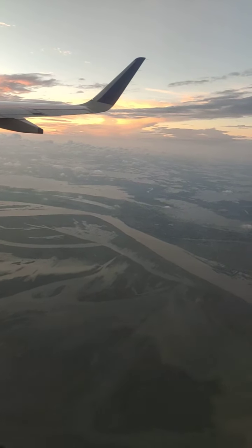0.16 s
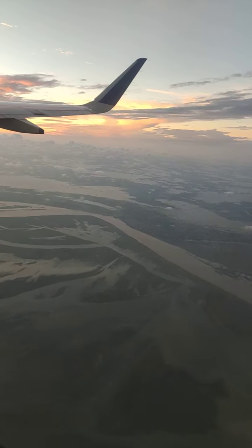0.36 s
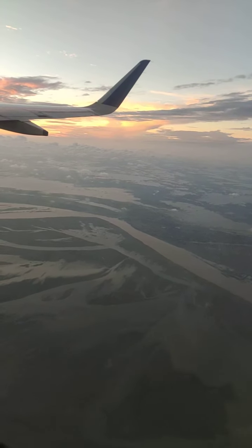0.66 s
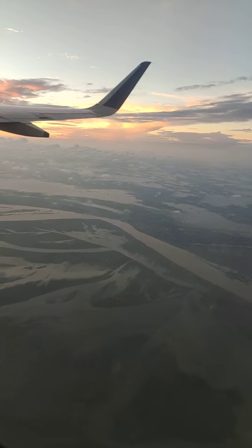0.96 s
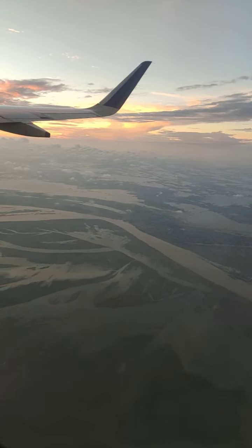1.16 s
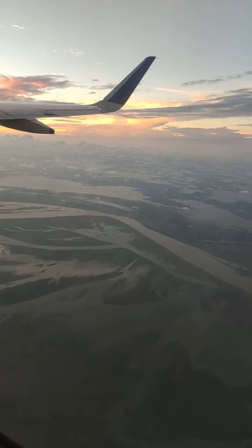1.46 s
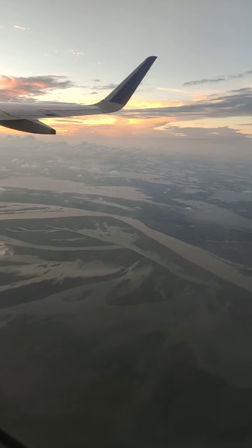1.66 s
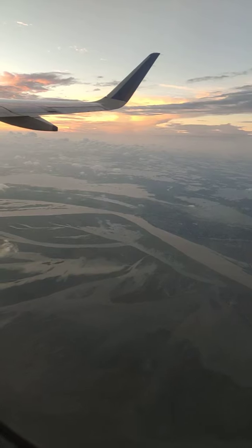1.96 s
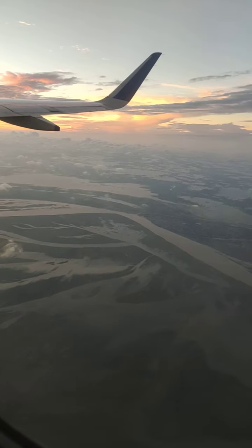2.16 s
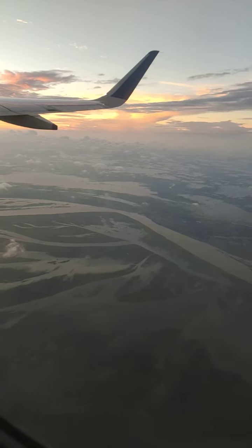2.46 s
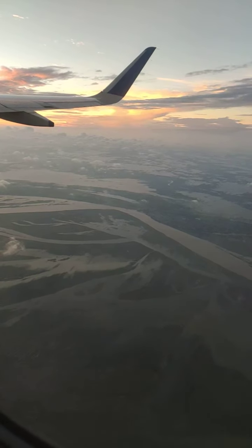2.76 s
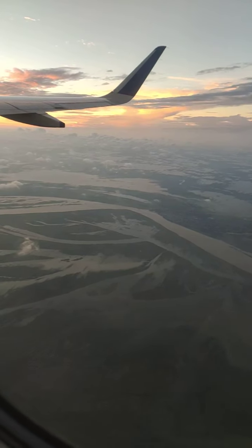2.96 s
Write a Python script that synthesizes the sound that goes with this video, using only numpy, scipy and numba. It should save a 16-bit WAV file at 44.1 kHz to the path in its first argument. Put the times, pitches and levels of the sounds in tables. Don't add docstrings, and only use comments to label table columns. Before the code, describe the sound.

Airliner cabin drone runs unbroken for about 3.1 seconds: a dense low rumble, strongest around 100 to 500 hertz, quivering in small irregular lumps without any trend. A faint, hollow, grainy air hiss differs left and right. A barely audible thin tick comes at 0.1; faint rising seal whistles at about 2.0 and 2.5 are nearly buried. Close phone at the window, no echo.

```python
import sys
import numpy as np
from scipy import signal
from scipy.fft import rfft, irfft
from scipy.io import wavfile
from scipy.ndimage import map_coordinates
from numba import njit

SR = 44100
rng = np.random.default_rng(int(sys.argv[2]) if len(sys.argv) > 2 else 0)


def wav_record(signal):
    frames = np.transpose(np.atleast_2d(signal))
    bounded = np.clip(frames, -1, 1)
    quanta = np.round(bounded * 32767).astype(np.int16)
    wavfile.write(sys.argv[1], SR, quanta)


def makeup_ratio(level_db):
    decades = np.asarray(level_db, float) / 20
    return 10 ** decades


N = 136710


def rumble():
    # f/Hz, density/dB per Hz
    slope = [(25, -73), (40, -82), (90, -52), (135, -46.5), (330, -45.5), (500, -55), (700, -73),
             (4000, -160)]
    # f/Hz, width/Hz, gain/dB
    panel_modes = [(42, 10, 9), (146.8, 30.5, 6.5), (276.4, 124, 4), (500, 50, 3), (549, 30, 3.5)]
    # t/s, level/dB
    buffet = [(0.0, -29), (0.08, -34), (0.14, -33), (0.33, -35.5), (0.34, -32.5), (0.66, -34.5),
              (0.69, -34.5), (0.98, -37), (1.04, -33.5), (1.22, -33), (1.64, -35), (1.67, -37.5),
              (1.77, -31), (1.91, -37), (1.98, -33), (2.12, -34), (2.23, -31.5), (3.08, -35.5)]
    # t/s, length/s, f/Hz, width/octaves, gain/dB
    booms = [(.05, 0.077, 139, 0.96, -9), (.16, 0.078, 150, 0.28, -1), (.2, .08, 78.2, 0.36, -3.5),
             (.25, .05, 407, 0.16, 6), (.37, .05, 150, 0.39, 5), (.47, 0.038, 208, 0.5, 5),
             (.52, .03, 120, 0.66, 7.5), (.61, 0.045, 164, 0.27, -8.5), (.65, 0.09, 418, .3, -3),
             (.71, .04, 162.3, .5, 14), (.85, 0.035, 90.8, 0.36, 9.5), (.94, .04, 136, .3, -7),
             (.96, .05, 308, .15, 7), (1.04, .04, 97.7, 0.36, 6), (1.08, 0.025, 500, 0.39, 9),
             (1.18, 0.059, 249, 0.16, 5), (1.25, .06, 150, 0.38, -7), (1.29, 0.11, 396, 0.17, -6),
             (1.37, .04, 220, 0.27, 8), (1.45, 0.074, 367, 0.13, 3), (1.5, 0.021, 263, 0.12, 5.5),
             (1.65, .06, 212, 0.22, 7), (1.76, 0.055, 248, 0.23, -4), (1.8, 0.069, 85, .4, -6.5),
             (1.93, .05, 406, 0.45, -3), (1.94, .03, 146, 0.35, 11), (1.99, 0.024, 211, 0.18, -6.5),
             (2.0, 0.05, 304, 0.19, 15.5), (2.06, .04, 381, 0.17, 6.5), (2.24, 0.044, 349, 0.29, -2.5),
             (2.28, 0.047, 145.4, .3, 2.5), (2.33, 0.021, 236, .15, -8), (2.42, 0.025, 292, .15, 6.5),
             (2.5, 0.071, 140, 0.24, -8), (2.43, 0.024, 436, 0.22, -7), (2.62, 0.032, 393, 0.26, -10.5),
             (2.65, .05, 90, 0.73, 10.5), (2.8, 0.053, 384, 0.32, 6.5), (2.85, 0.036, 230, 0.27, -1),
             (3.04, 0.063, 393, 0.18, 2)]
    level_db, buffet_ref_db, buffet_depth = -10, -30, 1.1
    right_db, left_lag_s = 0.74, 0.00019

    def lumps_db(hz, t):
        swell_db = buffet_depth * (np.interp(t, *np.array(buffet).T) - buffet_ref_db)
        swell_db = swell_db + spots_db(booms, hz, t)
        slow_db = 0.69 * field(hz, t, rate=2.7, per_octave=1.4)
        fast_db = 2.72 * field(hz, t, rate=17, per_octave=2.979)
        return level_db + swell_db + slow_db + fast_db

    low = patchy(coloured(slope, panel_modes), lumps_db, size=1024)
    late = map_coordinates(low, [np.arange(N) - left_lag_s * SR], mode="mirror")
    return np.array([late, low * makeup_ratio(right_db)])


def cabin_air():
    # f/Hz, density/dB per Hz
    air_left = [(40, -99), (150, -79), (350, -70), (1050, -89), (2350, -99), (3900, -105), (6200, -108),
                (15500, -124)]
    air_right = [(40, -95.5), (150, -89.5), (350, -74), (800, -78), (1250, -92.5), (3500, -92.5),
                 (5200, -103), (13000, -122.5)]
    # f/Hz, width/Hz, gain/dB
    cavity_left = [(150, 53, 15), (1647, 206, 18), (1482, 184, 10), (1864, 140, 9), (2330, 140, 1.5),
                   (2920, 560, 14.5), (3390, 180, 5), (4280, 440, 4.5), (5100, 400, -7), (6700, 220, 6),
                   (7350, 400, 12.5), (8960, 85, -10), (10100, 1600, 2)]
    cavity_right = [(138, 9.2, 18.5), (1578, 330, 11), (1640, 50, 3), (2330, 49, -3.5), (2360, 79, -6.5),
                    (2540, 190, 7), (3810, 200, -3.5), (4700, 270, 4), (5130, 300, -3.5),
                    (6514, 1020, 11.5), (6804, 130, 9), (7060, 530, 0.5), (9100, 140, -1.5),
                    (10200, 1400, 3), (14900, 1500, 7)]
    # t/s, level/dB
    flow = [(0.0, -45.5), (0.02, -46.5), (0.14, -52), (0.26, -54), (0.46, -58), (0.49, -58), (0.76, -49.5),
            (1.28, -53.5), (1.33, -49), (1.39, -59), (1.51, -50), (1.93, -46.5), (1.98, -55.5), (2.09, -48),
            (2.32, -58.5), (2.33, -46.5), (2.62, -55.5), (3.08, -49)]
    # t/s, length/s, f/Hz, width/octaves, gain/dB
    puffs = [(0.146, 0.074, 2400, 3.1, 2), (0.39, 0.14, 966, 0.69, 9), (0.792, 0.03, 680, 0.25, 13),
             (1.12, 0.11, 2880, .15, 5), (1.234, 0.017, 507, 0.6, 21.5), (1.329, 0.039, 3580, 0.29, 11),
             (1.58, 0.028, 1800, 0.92, 0), (1.864, 0.14, 2730, 0.071, 5), (2.202, 0.021, 1190, 0.41, 9),
             (2.373, .03, 700, .5, 10), (2.794, 0.046, 3020, .6, 6.5), (3.01, 0.0093, 3010, 2.1, 2.5),
             (.17, .06, 1055, .2, 7), (.22, .08, 3000, .15, -5), (.38, .05, 613, .3, -7),
             (.42, .06, 2300, .2, 4.5), (.62, .06, 3400, .1, -4), (.68, .08, 2810, .08, 2),
             (.92, .05, 896, .2, 5), (1.08, .03, 1935, .1, 8.5), (1.19, .04, 1900, .1, -8),
             (1.51, .05, 2310, .08, 7.5), (1.58, .05, 2950, .08, -5), (1.65, .07, 1915, .1, 4),
             (1.68, .07, 3800, .1, 2), (1.79, .04, 800, .2, -6.5), (1.9, .12, 3480, .08, -7.5),
             (1.98, .04, 1200, .15, 6), (2.05, .06, 2180, .1, 2.5), (2.17, .08, 1910, .07, -10),
             (2.43, .04, 2750, .07, -6.5), (2.64, .04, 740, .2, 8.5), (2.77, .04, 776, .2, 9),
             (2.68, .06, 3220, .07, 5.5), (2.96, .07, 2800, .3, -3.5), (3.07, .04, 1310, .4, 4),
             (2.29, .02, 5100, 1.2, 0.5)]
    # t/s, length/s, gain/dB
    cavity_swells = [(.18, 0.032, -2.5), (0.511, 0.049, -4), (0.679, .05, 2.5), (0.903, 0.036, -1),
                     (0.998, .04, 2), (1.326, 0.029, 5.5), (1.451, .04, -1), (1.849, .04, -3),
                     (2.08, .04, 3.5), (2.17, .04, 0.5), (2.362, 0.11, 3.5), (2.602, 0.037, -4),
                     (2.7, 0.029, 1), (3.007, 0.055, 1.5)]
    cavity_hz, cavity_octaves = 1570, 0.2
    level_db, flow_ref_db, flow_depth = 0.5, -51.5, 0.39
    flow_from_hz, steady_above_hz = 190, 6000
    crosstalk = 0.049

    def gusts_db(hz, t):
        square = hz[:, None] ** 2
        reach = square / (square + flow_from_hz ** 2)
        calm = steady_above_hz ** 2 / (square + steady_above_hz ** 2)
        stream_db = np.interp(t, *np.array(flow).T) - flow_ref_db
        db = level_db + flow_depth * calm * reach * stream_db
        singing = [(at, length, cavity_hz, cavity_octaves, gain_db) for at, length, gain_db in cavity_swells]
        db = db + spots_db(puffs + singing, hz, t)
        broad_db = 1.05 * np.sqrt(calm) * field(hz, t, rate=30, per_octave=0.44)
        fine_db = 0.61 * calm * field(hz, t, rate=12, per_octave=4.0)
        return db + broad_db + fine_db + 3.0 * streaks(hz, t, rate=15, width_hz=100)

    def port_streaks_db(hz, t):
        return 2.0 * streaks(hz, t, rate=14, width_hz=90)

    ports = np.array([coloured(air_left, cavity_left), coloured(air_right, cavity_right)])
    together = patchy(ports + crosstalk * ports[::-1], gusts_db, size=1024)[:, :N]
    return np.array([patchy(port, port_streaks_db, size=1024) for port in together])


def seal():
    # t/s, length/s, from f/Hz, to f/Hz, level/dB
    seal_whistles = [
        (2.03, 0.098, 297, 369, -51),
        (2.457, 0.13, 370, 521, -50.5),
    ]
    t, out = np.arange(N) / SR, 0
    for start, length, from_hz, to_hz, db in seal_whistles:
        part = np.clip((t - start) / length, 0, 1)
        phase = 2 * np.pi * np.cumsum(from_hz + (to_hz - from_hz) * part) / SR
        swell = np.sqrt(np.abs(np.sin(np.pi * part)))
        out = out + makeup_ratio(db) * swell * np.sin(phase)
    return out * np.array([[-.6], [1.1]])


def ticks():
    # t/s, level/dB
    case_ticks = [
        (.1, -56.5),
    ]
    decay_s = .002
    t, out = np.arange(N) / SR, 0
    for start, db in case_ticks:
        decay = (t > start) * np.exp(-np.clip(t - start, 0, 1) / decay_s)
        out = out + makeup_ratio(db) * decay * rng.standard_normal(N)
    thin = signal.butter(4, 12500, "high", fs=SR, output="sos")
    return signal.sosfilt(thin, out) * np.array([[.5], [1.1]])


def coloured(slope, resonances):
    hz = np.arange(N // 2 + 1) * SR / N + 1
    slope_hz, slope_db = np.array(slope).T
    db = np.interp(np.log(hz), np.log(slope_hz), slope_db)
    for centre, width, gain_db in resonances:
        db = db + gain_db / (1 + ((hz - centre) / (width / 2)) ** 2)
    return irfft(rfft(rng.standard_normal(N)) * makeup_ratio(db) * np.sqrt(SR / 2), N)


def patchy(x, gain_db, size):
    hz, t, cells = signal.stft(x, SR, nperseg=size, noverlap=size * 3 // 4, boundary="even")
    return signal.istft(cells * makeup_ratio(gain_db(hz, t)), SR, nperseg=size, noverlap=size * 3 // 4)[1][:N]


def field(hz, t, rate, per_octave):
    grid = rng.standard_normal((200, 200))
    place = np.broadcast_arrays(np.log2(1 + hz[:, None] / 40) * per_octave, t[None] * rate)
    return map_coordinates(grid, place, order=3, mode="mirror")


def streaks(hz, t, rate, width_hz):
    grid = rng.standard_normal((300, 100))
    place = np.broadcast_arrays(hz[:, None] / width_hz, t[None] * rate)
    return map_coordinates(grid, place, order=3, mode="mirror")


def spots_db(rows, hz, t):
    pitch, total = np.log2(hz[:, None] + 1), 0
    for at, length, centre_hz, octaves, gain_db in rows:
        time_off = (t - at) / length
        pitch_off = (pitch - np.log2(centre_hz)) / octaves
        total = total + gain_db * np.exp(-time_off ** 2 - pitch_off ** 2)
    return total


@njit
def follow(x, attack, release, start):
    y, e = np.empty(len(x)), start
    for i in range(len(x)):
        e += (abs(x[i]) - e) * (attack if abs(x[i]) > e else release)
        y[i] = e
    return y


def gain_control(x):
    ratio, attack_s, release_s = 1.15, .01, .04
    top = float(makeup_ratio(-36))
    env = follow(x.mean(0), 1 / (attack_s * SR), 1 / (release_s * SR), top)
    return x * (top / env) ** (1 - 1 / ratio)


def denoise(x):
    depth, floor_db, from_hz = 0.97, -28, 250
    hz, t, cells = signal.stft(x, SR, nperseg=1024, noverlap=768, boundary="even")
    power = np.abs(cells) ** 2 + 1e-20
    relative = power / power.mean(-1, keepdims=True)
    strength = depth * hz[:, None] ** 2 / (hz[:, None] ** 2 + from_hz ** 2)
    gain = np.clip(relative ** (strength / 2), makeup_ratio(floor_db), 1)
    return signal.istft(cells * gain, SR, nperseg=1024, noverlap=768)[1][:, :N]


def scene():
    return rumble() + cabin_air() + seal() + ticks()


def band_limit(x):
    return signal.sosfilt(signal.butter(12, 16410, fs=SR, output="sos"), x)


def record(dry):
    edge_s, top_hz = .005, 15430
    edge = np.minimum(np.arange(N), np.arange(N)[::-1]) / (edge_s * SR)
    faded = dry * np.sin(np.pi / 2 * np.clip(edge, 0, 1)) ** 2
    held = denoise(gain_control(faded))
    top_cut = signal.ellip(10, .2, 60, top_hz, fs=SR, output="sos")
    return band_limit(signal.sosfilt(top_cut, held))


dry = scene()
out = record(dry)
wav_record(out)
```